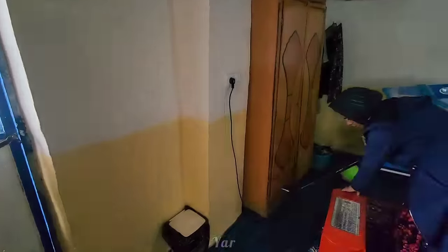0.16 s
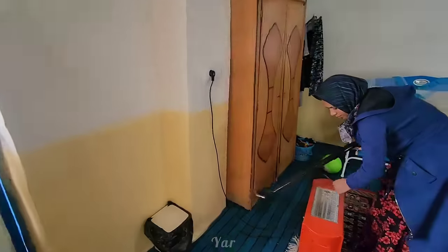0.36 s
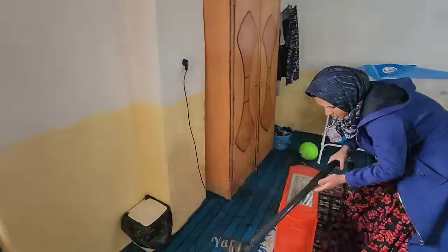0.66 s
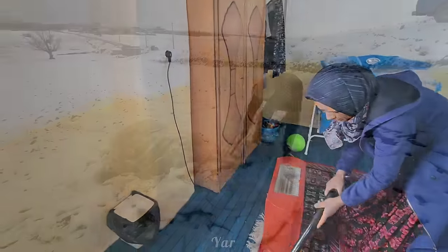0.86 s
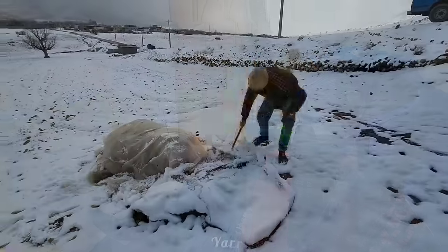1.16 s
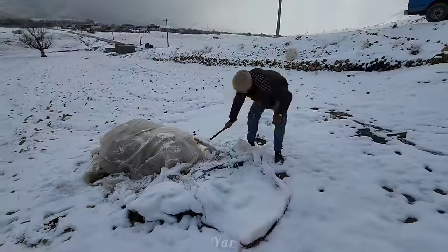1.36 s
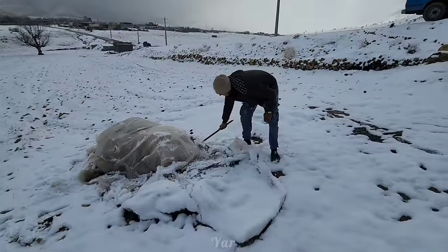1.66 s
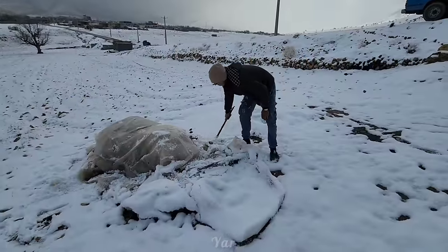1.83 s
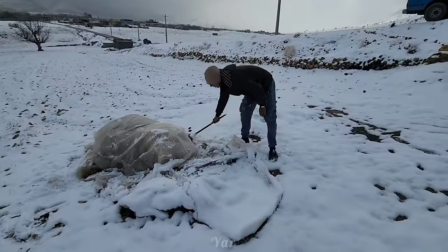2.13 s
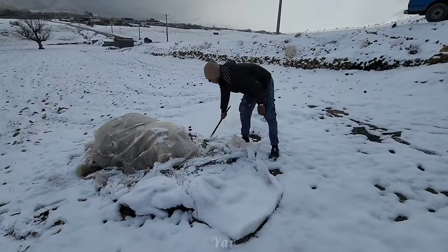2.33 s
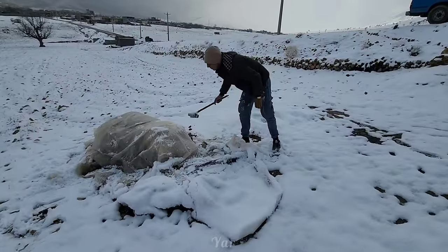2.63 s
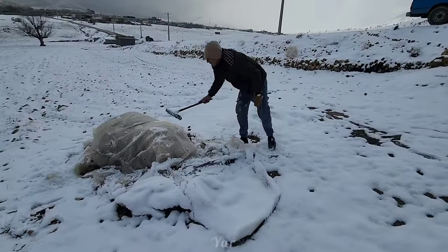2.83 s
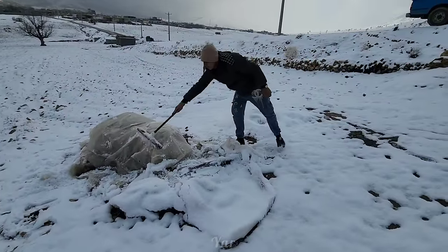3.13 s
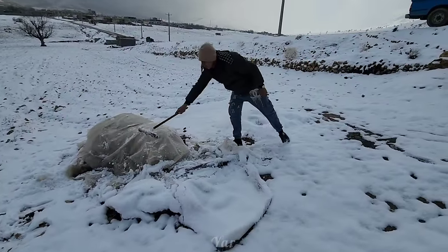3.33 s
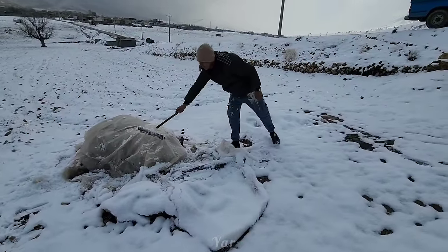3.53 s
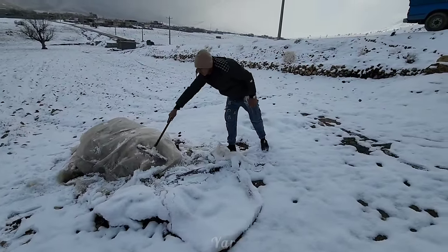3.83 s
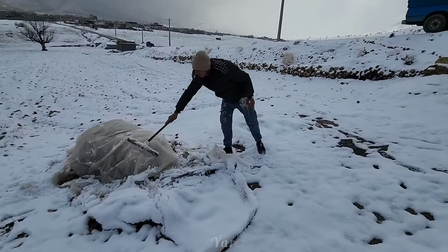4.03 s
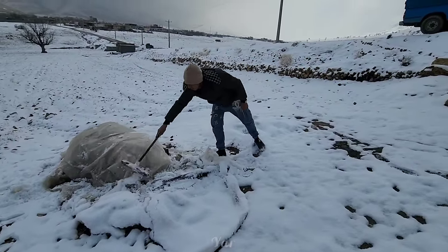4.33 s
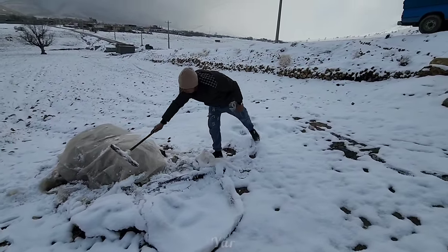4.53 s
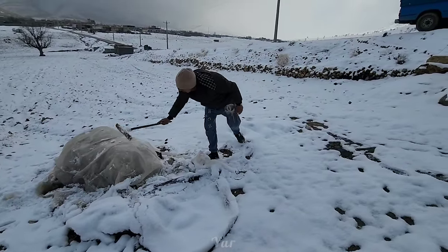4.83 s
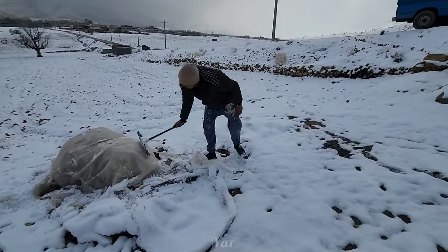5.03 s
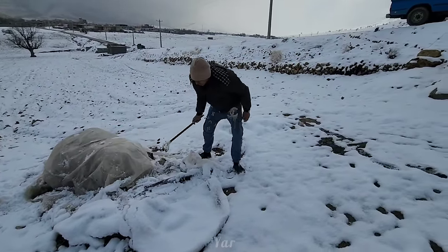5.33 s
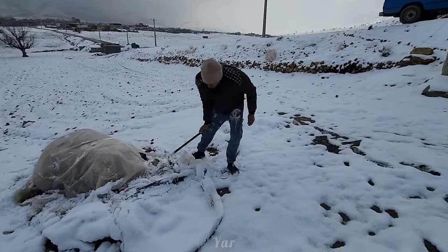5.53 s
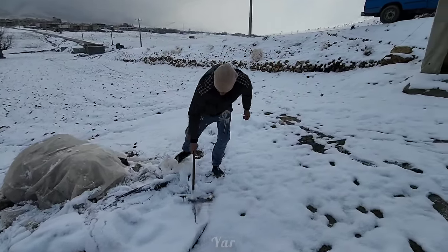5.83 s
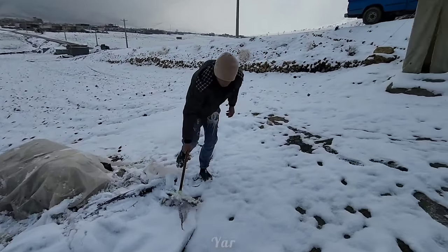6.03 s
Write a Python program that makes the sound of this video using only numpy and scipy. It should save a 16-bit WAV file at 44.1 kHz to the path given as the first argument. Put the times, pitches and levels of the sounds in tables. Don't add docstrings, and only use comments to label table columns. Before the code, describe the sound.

Loud indoor vacuuming gives way to a quiet snowy field, where broom scrapes, sharp crusty beats and small snaps come between soft wind buffets.

```python
import sys
import numpy as np
from scipy import signal
from scipy.fft import rfft, irfft, next_fast_len
from scipy.io import wavfile
from scipy.ndimage import uniform_filter1d

SR = 44100
rng = np.random.default_rng(int(sys.argv[2]) if len(sys.argv) > 2 else 0)


def invert_db(x):
    u = np.asarray(x, float) / 20
    return 10 ** u


def unload_audio(sound):
    columns = np.transpose(np.atleast_2d(sound))
    steps = np.round(np.clip(columns, -1, 1) * 32767)
    wavfile.write(sys.argv[1], SR, steps.astype(np.int16))


N = 272538


def rms_one(x):
    return x / np.sqrt(np.mean(x ** 2) + 1e-20)


def in_time(rows):
    s, *columns = np.transpose(rows)
    return [np.interp(np.arange(N) / SR, s, column) for column in columns]


def at_hz(points, hz):
    point_hz, values = np.transpose(points)
    return np.interp(np.log(hz), np.log(point_hz), values)


def drift(rate_hz, n):
    r = np.exp(-40 * np.pi * rate_hz / SR)
    white = rng.standard_normal(n // 20 + 2002)
    slow = signal.lfilter([1], [1, -2 * r, r * r], white)[2000:]
    return np.interp(np.arange(n) / 20, np.arange(len(slow)), rms_one(slow))


def band(x, low_hz, high_hz):
    return signal.sosfilt(signal.butter(2, [low_hz, high_hz], "band", fs=SR, output="sos"), x)


def ring(x, hz, width_hz):
    r = np.exp(-np.pi * width_hz / SR)
    poles = [1, -2 * r * np.cos(2 * np.pi * hz / SR), r * r]
    return signal.lfilter([(1 - r * r) / 2, 0, (r * r - 1) / 2], poles, x)


def evened(x, span_s):
    power = uniform_filter1d(np.mean(x ** 2, axis=0), size=round(span_s * SR))
    return x / (power + .05) ** .35


def coloured(sources, spectrum, likeness, registers_hz, patchy_db, flicker_hz):
    out = np.zeros((len(registers_hz) + 1,) + sources.shape[1:])
    edges_hz = 16 * 2 ** np.arange(0, 10.1, 1 / 3)
    for k, (low, high) in enumerate(zip(edges_hz, edges_hz[1:])):
        hz = np.sqrt(low * high)
        if spectrum[0][0] < hz < spectrum[-1][0]:
            mid, side = band(sources[k % 2], low, high)
            alike = np.clip(at_hz(likeness, hz), -.99, .99)
            gain = invert_db(at_hz(spectrum, hz) + patchy_db * drift(flicker_hz, len(mid)))
            pair = np.sqrt(1 + alike) * mid + np.sqrt(1 - alike) * side * [[1], [-1]]
            out[np.searchsorted(registers_hz, hz)] += gain * pair
    return [part / np.sqrt(np.mean(part.mean(axis=0) ** 2) + 1e-20) for part in out]


def echoed(x, t60_s, wet_db, hold_s):
    n, hop = x.shape[-1], round(hold_s * SR)
    t = np.arange(round(t60_s * SR)) / SR
    out = np.pad(x, ((0, 0), (0, 0), (0, 3 * hop + len(t))))
    padded = np.pad(x, ((0, 0), (0, 0), (hop, 2 * hop)))
    for i in range(0, n + hop, hop):
        piece = padded[..., i:i + 2 * hop]
        piece = piece * np.sqrt(np.hanning(piece.shape[-1]))
        tail = rng.standard_normal(x.shape[:2] + t.shape) * invert_db(-60 * t / t60_s)
        tail = tail / np.sqrt(np.sum(tail ** 2, axis=-1, keepdims=True))
        wet = signal.fftconvolve(piece, tail, axes=-1)
        skip = max(hop - i, 0)
        out[..., i - hop + skip:i - hop + wet.shape[-1]] += invert_db(wet_db) * wet[..., skip:]
    return out[..., :n]


def wind():
    # start_s, buffet_db, left_over_right_db
    gust_rows = [(1.26, -42, 0), (1.39, -56, -8), (1.63, -42, 5), (1.89, -49, 4), (2.07, -54, 7),
                 (2.22, -47, 12.5), (2.49, -43, -5.5), (2.56, -53, 6.5), (2.92, -52, 4), (3.02, -38.5, 7),
                 (3.09, -57.5, 3), (3.8, -58, 3), (3.91, -49.5, -6), (4.74, -60, 4.5), (5.14, -60, -2),
                 (5.86, -68, -1), (5.95, -53.5, 12), (6.18, -52.5, 4.5)]
    # freq_hz, level_db (per Hz)
    buffet_spectrum = [(8.8, -37), (15, -12), (43, -1), (70, -2), (114, -13), (184, -27.5), (275, -59.5),
                       (300, -96), (390, -65), (660, -120)]
    # freq_hz, level_db (per Hz)
    field_spectrum = [(120, -29.5), (200, 0), (254, 4.5), (612, 9.5), (851, 2), (1500, 2.5), (2700, -17.5),
                      (7680, -17), (11500, -22.5), (16000, -24)]
    field_db = -70
    buffet_db, pan_db = in_time(gust_rows)
    fade_in = np.clip((np.arange(N) / SR - .7) / 0.84, 0, 1)
    white = rng.standard_normal((2, 2, N))
    buffet, = coloured(white, buffet_spectrum, [(20, .85), (300, .9)], [], patchy_db=2.0, flicker_hz=8.0)
    hush, = coloured(white, field_spectrum, [(200, .5), (1500, .1), (16000, .1)], [],
                     patchy_db=2.2, flicker_hz=10.0)
    gusts = invert_db(buffet_db + 3.5 + 1.9 * drift(15.0, N) + pan_db * np.array([[.5], [-.5]]))
    return fade_in * (gusts * evened(buffet, 0.059) + invert_db(field_db) * hush)


def swells(rows, n):
    edge_db_per_s, node_db = 249, -28
    t = np.arange(n) / SR
    tops = []
    for start, end, db in rows:
        outside_s = np.maximum(np.maximum(start - t, t - end), 0)
        tops.append(db - edge_db_per_s * outside_s)
    return np.maximum(np.max(tops, axis=0), node_db + min(db for *_, db in rows) / 2)


def booms(n):
    # start_s, end_s, level_db (above the roar), pitch_hz, width_hz
    hums = [(-.05, .22, -5.5, 262, 30), (.33, 0.734, -7.5, 258, 32), (0.827, .95, -4, 255, 30),
            (1.065, 1.175, -6.5, 258, 30), (-.05, .13, -7, 110, 60), (.1, 0.22, -3, 1200, 72),
            (0.265, .46, -6, 1040, 53), (0.635, 0.694, 2, 1030, 50), (0.32, 0.22, -3.5, 800, 44),
            (.42, 0.57, -7, 860, 56), (0.91, 0.932, 1, 810, 50), (0.37, 0.33, -5.5, 470, 40),
            (0.455, 0.61, -7, 465, 35), (.56, 0.66, -8, 2150, 90), (.72, 0.82, -6.5, 1400, 60)]
    alike_below_hz = 700.0
    out, noise = 0, rng.standard_normal((2, n))
    for start, end, db, hz, width in hums:
        mid, side = ring(ring(noise, hz, width), hz, width)
        pair = mid + min((hz / alike_below_hz) ** 2, 1) * side * [[1], [-1]]
        steady = evened(pair / np.sqrt(np.mean(mid ** 2)), 0.022)
        out = out + invert_db(swells([(start, end, db)], n)) * steady
    return out


def rotor_tones(roar_db, n):
    # time_s, turns_per_s
    shaft_speed = [
        (0, 554.2),
        (1.0, 554.2),
        (1.2, 555.4),
        (1.4, 556.0),
    ]
    # start_s, end_s, level_db (above the roar)
    shaft_swells = [(-.05, .2, -8), (.27, .36, -11), (.54, .68, -12.5), (.76, 1.4, -3.5)]
    # start_s, end_s, level_db (above the roar)
    blade_swells = [(.06, .17, -18), (.3, .55, -22.5), (.55, .88, -16), (.88, 1.0, -18), (1.0, 1.12, -16),
                    (1.12, 1.27, -20.5)]
    # start_s, end_s, level_db (above the roar)
    whistle_swells = [(.06, .2, -20.5), (.2, .27, -27), (.33, .51, -23), (.53, .67, -28), (.73, .81, -26.5),
                      (.87, .98, -27.5), (1.03, 1.194, -29), (1.3, 1.42, -29)]
    # time_s, shaft_db, blade_db, whistle_db
    tone_pan = [(0, 14, -3, -9), (.2, 10, 0, -8), (.3, -3, -3, -6), (.55, -12, -3, -8), (.75, -2, -12, -10),
                (1.15, 0, -10, 0)]
    blades, waver_db = 9, 1.6
    speed = in_time(shaft_speed)[0][:n] * (1 + 0.000093 * drift(1.6, n))
    turn = 2 * np.pi * np.cumsum(speed) / SR
    orders, lags = [1, blades, 2 * blades], [.2, 1.0, 1.0]
    tones = invert_db(roar_db - 34) * np.sin(3 * blades * turn)
    for order, lag, rows, pan_db in zip(orders, lags, [shaft_swells, blade_swells, whistle_swells],
                                        in_time(tone_pan)):
        level = invert_db(roar_db + swells(rows, n) + 0.3 + waver_db * drift(8.0, n))
        pan = np.sqrt(8) / (1 + invert_db(pan_db[:n] * np.array([[-1], [1]])))
        tones = tones + pan * level * np.sin(order * turn + lag * np.array([[.5], [-.5]]))
    return tones


def vacuum():
    # time_s, roar_db
    suction = [
        (0.0, -31.5),
        (0.45, -29.5),
        (0.75, -33),
        (1.0, -33.5),
        (1.25, -39),
        (1.36, -45),
        (1.48, -59),
    ]
    # freq_hz, level_db (per Hz)
    air_spectrum = [(18, -37.5), (30, -17.5), (93, -7), (194, -8.5), (259, -9.5), (512, -6), (554, -7.5),
                    (740, -3), (1040, 1.5), (1160, -2), (1860, -2), (2750, -12), (7470, -20.5),
                    (10800, -35), (16000, -27)]
    # pitch_hz, width_hz, level_db
    casing = [(258, 26, 1.5), (290, 43, 0), (350, 27, 0.5), (630, 21, -2.5), (469, 53, 0.5),
              (846, 13, -5.5), (1040, 70, -1), (1430, 20, -4.5), (2040, 200, -3.5), (3400, 300, -8),
              (7400, 240, -4.5)]
    # freq_hz, likeness
    room_likeness = [(60, .95), (130, .93), (290, .93), (640, .45), (1400, 0), (15000, 0)]
    rush_over_roar_db, hiss_over_roar_db = 1, -3
    turn_away_s, turn_s, dulling_db = 0.81, 0.18, 5.5
    n = round(suction[-1][0] * SR) + 2000
    gate = np.clip((n - np.arange(n)) / 4000, 0, 1)
    roar_db = in_time(suction)[0][:n]
    dull_db = dulling_db * np.clip((np.arange(n) / SR - turn_away_s) / turn_s, 0, 1)
    white = echoed(rng.standard_normal((2, 2, n)), .2, 0.96, hold_s=0.1204)
    white = white + sum(invert_db(db) * ring(white, hz, width) for hz, width, db in casing)
    roar, rush, hiss = coloured(white, air_spectrum, room_likeness, [750, 2500],
                                patchy_db=0.82, flicker_hz=2.1)
    air = evened(roar, 0.08) + booms(n)
    air = air + invert_db(rush_over_roar_db - dull_db) * rush
    air = air + invert_db(hiss_over_roar_db - dull_db) * hiss
    cleaner = invert_db(roar_db) * air + rotor_tones(roar_db, n)
    return np.pad(cleaner * gate, ((0, 0), (0, N - n)))


def bumps():
    # peak_s, half_length_s, peak_db, pitch_hz
    bump_rows = [(1.283, 0.011, -26, 221), (1.536, 0.021, -30.5, 116.5), (2.171, 0.0088, -38.5, 59),
                 (2.301, 0.025, -37.5, 117), (2.94, 0.0089, -34, 57), (3.016, .015, -31, 75),
                 (3.452, 0.021, -46, 55), (3.586, 0.016, -42.5, 55), (3.82, 0.013, -23.5, 158.6),
                 (3.939, 0.0095, -36, 76), (4.241, 0.012, -21.5, 105), (4.58, 0.011, -28.5, 189),
                 (4.952, 0.0083, -33, 68.5), (5.176, 0.0075, -41, 57.6), (5.728, 0.0064, -44, 90)]
    t = np.arange(N) / SR
    out = np.zeros(N)
    for s, half, db, hz in bump_rows:
        out += invert_db(db) * np.exp(-.5 * ((t - s) / half) ** 2) * np.sin(2 * np.pi * hz * (t - s))
    return out


def whirs():
    # middle_s, half_length_s, level_db, pitch_hz, width_hz
    short_noises = [(4.82, .08, -69, 567, 80), (3.07, .09, -44, 540, 140), (2.47, .02, -63, 1550, 160),
                    (2.522, .018, -63, 1500, 160), (2.52, .015, -64, 1150, 120), (2.59, .018, -64, 1520, 130),
                    (2.68, .025, -69, 1400, 200), (2.675, .015, -65, 600, 120), (2.12, .03, -73, 1450, 120),
                    (2.03, .015, -64, 700, 250), (1.53, .03, -48, 1500, 400), (3.343, .006, -52, 4000, 1500),
                    (3.345, .012, -46, 420, 150), (3.81, .025, -34, 1500, 500), (3.815, .025, -33, 780, 250),
                    (4.365, .008, -52, 2600, 900), (5.37, .085, -73, 2060, 110), (5.29, .008, -62, 1560, 250),
                    (5.6, .008, -63, 2000, 200), (5.575, .007, -66, 1100, 200), (5.725, .012, -37, 1350, 600),
                    (5.752, .006, -44, 600, 250), (5.84, .012, -48, 700, 300), (5.0, .03, -52, 2000, 400),
                    (4.95, .012, -46, 1600, 300), (5.36, .015, -62, 500, 150), (6.14, .012, -62, 700, 300),
                    (3.04, .04, -48, 1500, 700), (3.36, .04, -64, 13500, 3000), (5.745, .03, -57, 12000, 5000),
                    (5.735, .02, -44, 300, 150), (5.727, .0015, -33, 1600, 1500), (5.732, .0015, -35, 1000, 900),
                    (5.765, .002, -44, 1500, 1200), (5.823, .0015, -45, 1500, 1200),
                    (1.561, .0015, -41, 1800, 1500), (1.59, .002, -42, 1500, 1200), (1.81, .002, -48, 5000, 3000),
                    (1.773, .003, -50, 2500, 1800), (1.664, .002, -48, 2200, 1500)]
    out, noise = np.zeros(N), rng.standard_normal(N)
    for s, half, db, hz, width in short_noises:
        first = round((s - 2 * half) * SR) - 1000
        span = np.arange(first, min(round((s + 2 * half) * SR), N))
        creak = rms_one(ring(ring(noise[span], hz, width), hz, width))
        out[span] += invert_db(db) * np.exp(-((span / SR - s) / half) ** 4) * creak
    return out


def cracks():
    # start_s, ring_db, pitch_hz, snap_db
    snaps = [(1.449, -34, 6000, -48), (1.488, -44, 5000, -25.5), (1.516, -23.5, 1430, -23),
             (1.605, -31, 1490, -46), (1.418, -32, 2450, -44), (1.478, -49, 9000, -48),
             (1.535, -36, 12500, -32), (1.572, -30, 3000, -34), (1.81, -42, 4500, -40),
             (2.2499, -40, 2500, -38), (2.2948, -37, 2500, -34), (3.074, -36, 9500, -28),
             (3.128, -32, 11000, -34), (3.145, -39, 5530, -38), (3.794, -18, 1470, -26),
             (3.806, -30, 5900, -20), (4.2208, -29, 930, -15), (4.238, -22, 3500, -17),
             (4.675, -50, 4950, -49), (4.992, -39, 4500, -42), (5.052, -49, 7000, -55.5),
             (5.703, -41, 3550, -34), (5.752, -32, 2960, -33), (4.79, -59, 13000, -54),
             (1.769, -39, 910, -50), (1.824, -46, 1450, -27), (1.851, -37, 700, -50),
             (2.3434, -38, 2600, -33), (2.3658, -24, 540, -20.5), (2.989, -32, 5100, -42),
             (3.083, -35, 6130, -21), (3.097, -29, 900, -21), (3.114, -38, 5560, -16),
             (3.265, -52, 5000, -52), (3.34, -27.5, 387, -41), (3.8221, -26, 910, -8),
             (4.059, -58, 1000, -53), (4.3588, -24.5, 1420, -23.5), (4.578, -24, 504, -9.5),
             (4.941, -24.5, 577, -35), (4.909, -52, 905, -48), (5.107, -60, 3500, -59),
             (5.14, -58, 3860, -43), (5.144, -61, 6000, -47), (5.291, -60, 9000, -54),
             (3.533, -59, 9000, -58), (5.8267, -27, 2600, -26)]
    # start_s, ring_db, pitch_hz
    knocks = [(2.155, -59, 3670), (1.635, -38, 1480), (3.02, -39, 5000), (3.05, -36, 5200),
              (3.156, -35, 2500), (3.17, -35, 1800), (3.2, -34, 2000), (4.074, -60, 1800),
              (4.145, -55, 3500), (4.386, -50, 4000), (5.004, -28, 1210), (5.018, -38, 1800),
              (5.034, -37, 1090), (5.067, -52, 1000), (5.315, -52, 1200), (5.493, -44, 500),
              (5.809, -37.5, 1490), (2.464, -52, 2000), (2.52, -47, 2520), (2.591, -49, 1520),
              (2.658, -58, 1430), (1.95, -65, 630), (1.978, -60, 740), (1.661, -38.5, 1510),
              (1.718, -40, 900), (1.808, -33.5, 915), (2.217, -49, 1510), (2.931, -46, 600),
              (3.232, -37.5, 530), (3.442, -40, 1510), (3.574, -44.5, 3980), (3.608, -53, 3660),
              (3.881, -29, 2500), (4.0035, -23, 900), (4.279, -23, 1090), (4.656, -28, 1030),
              (4.667, -29, 600), (4.835, -47, 555), (5.226, -34, 1220), (5.29, -44, 795),
              (5.351, -40.5, 560), (5.508, -35, 270), (5.656, -31, 340), (5.666, -41, 500),
              (5.7205, -19, 790), (5.738, -18, 674), (5.8316, -25, 930), (5.6, -45, 1500),
              (5.635, -63, 5000), (6, -48, 807), (6.012, -54, 2500)]
    snap_t60_s, knock_t60_s = 0.014, 0.010
    knock_snap_db, ring_trim_db = -30, -3
    ring_tilt = 0.28
    fizz_share, snap_top_hz = 0.32, 15000
    out, t = np.zeros((2, N + 3000)), np.arange(3000) / SR
    rows = [row + (snap_t60_s,) for row in snaps]
    rows += [(s, db, hz, db + knock_snap_db, knock_t60_s) for s, db, hz in knocks]
    noise = rng.standard_normal((len(rows), 3, 3000))
    for (s, ring_db, hz, snap_db, t60), (both, *own) in zip(rows, noise):
        t60 = np.clip(t60 * (1000 / hz) ** ring_tilt, .003, .06)
        rough = 0.77 * rms_one(ring(ring(both, hz, hz), hz, hz))
        tone = (rough - np.sin(2 * np.pi * hz * t)) * invert_db(ring_db - 60 * t / t60)
        spike = -np.exp(-((t - .0002) / .00005) ** 2)
        fizz = fizz_share * (.9 * both + .4 * np.array(own)) * invert_db(-60 * t / .015)
        crack = invert_db(ring_trim_db) * band(tone, hz / 3.0, min(4.0 * hz, 17000))
        crack = crack + invert_db(snap_db + 2) * band(spike + fizz, 700, snap_top_hz)
        out[:, round(s * SR):][:, :3000] += crack
    return out[:, :N]


def contacts():
    # start_s, swell_s, crunch_db, t60_s,
    # thump_db (above crunch)
    scrapes = [(1.265, 0.015, -36.5, 0.2, 2.5), (1.93, 0.063, -76, .3, 19), (1.40, 0.0088, -42.5, 0.8, -3),
               (1.484, 0.047, -36, 0.29, -2), (1.53, 0.048, -43, 0.27, 2), (1.754, 0.018, -46, 0.089, -1),
               (1.799, 0.018, -41.5, 0.15, -9), (1.84, 0.012, -47.5, .05, -8),
               (2.243, 0.006, -43, 0.38, 3.5), (2.278, 0.017, -42.5, 0.31, 1),
               (2.97, 0.015, -37.5, 0.31, -3), (2.99, 0.051, -34.5, 0.31, -8),
               (3.05, 0.053, -32.5, 0.23, -4), (3.1, 0.044, -37, 0.1, -2), (4.209, 0.0059, -29, 0.14, 2),
               (4.3, 0.012, -47.5, .14, 10.5), (4.645, 0.028, -38.5, 0.2, -1.5),
               (5.025, 0.017, -51, 0.061, 1.5), (5.699, 0.0095, -39.5, 0.31, -4),
               (5.822, 0.008, -42, 0.07, -12), (5.835, 0.018, -51, 0.077, -0.5)]
    # start_s, swell_s, crunch_db, t60_s, spray_db (above crunch)
    rustles = [(1.66, 0.035, -59.5, 1, -2.5), (2.19, 0.032, -63, .15, -4), (2.363, 0.0059, -57, 0.12, -10),
               (2.42, 0.078, -60.5, 0.4, -3.5), (2.64, 0.058, -70, 0.39, -2),
               (2.915, 0.054, -68, 0.17, -13), (3.16, 0.013, -52, 0.56, -2),
               (3.324, 0.019, -45.5, 0.17, 1.5), (3.36, .017, -61, 0.5, -2), (3.43, 0.021, -56, 0.088, -11),
               (3.568, .0077, -76, 0.6, 8), (4.05, 0.013, -49, 0.089, -8.5), (4.135, 0.03, -77, 0.77, 6),
               (5.198, 0.045, -53, 0.18, -2), (5.28, 0.069, -64, 1, -11), (5.345, .01, -53.5, 0.063, -10),
               (5.469, 0.033, -62, 0.32, -11.5), (5.55, 0.059, -60, 0.45, -7),
               (5.99, 0.017, -73, 0.32, -17.5), (6.105, 0.019, -61.5, 0.073, -2),
               (4.72, 0.081, -66, 1, 0.5), (2.5, 0.022, -57.5, 0.072, -10), (5.507, .005, -52, .06, -19),
               (5.654, .005, -51, .06, -18), (6.009, .005, -63, .05, -6)]
    # start_s, swell_s, crunch_db, slide_after_s, slide_db (above the beat)
    beats = [
        (3.783, 0.037, -20, 0.063, -15),
        (4.216, 0.02, -19, 0.046, -19),
        (4.555, 0.025, -22.5, 0.054, -13.5),
        (4.935, 0.01, -31.5, 0.021, -8),
        (5.709, 0.03, -33, 0.073, -17),
    ]
    scrape_spray_db, rustle_thump_db, rustle_fizz_db = -9, -5, -6
    rows = [row + (scrape_spray_db, 0) for row in scrapes]
    rows += [row[:-1] + (rustle_thump_db, row[-1], rustle_fizz_db) for row in rustles]
    slide_swell_s = 0.021
    for s, swell, db, after, slide_db in beats:
        beat = (s, swell, db, 0.13, -3.5, -8.5, 0)
        slide = (s + after, slide_swell_s, db + slide_db, 0.24, -2, -11.5, -3.5)
        trickle = (s + .15, slide_swell_s, db - 37.5, 1.0, -1, -3, -3)
        rows += [beat, slide, trickle]
    return rows


def pressure():
    touch_share, touch_longest_s = 0.29, .04
    sheen_base_db, sheen_per_db = -5.5, -0.1157
    fizz_base_db, fizz_per_db = -4.5, -0.12
    t, power = np.arange(0, N + 20, 20) / SR, 0
    for s, swell, db, t60, thump_db, spray_db, fizz_db in contacts():
        touch = np.clip((t - s) / np.clip(touch_share * swell, .004, touch_longest_s), 0, 1)
        rise_db = -7 * (1 - (t - s) / swell)
        fall_db = -60 * (t - s - swell) / t60
        shape_db = np.minimum(np.where(t < s + swell, rise_db, fall_db), 0)
        sheen_db = spray_db + sheen_base_db + sheen_per_db * (db + 39)
        finest_db = spray_db + fizz_db + fizz_base_db + fizz_per_db * (db + 38.5)
        registers_db = np.array([[thump_db], [0], [spray_db], [sheen_db], [finest_db]])
        power = power + (touch * invert_db(db + shape_db + registers_db)) ** 2
    return [np.interp(np.arange(N) / SR, t, np.sqrt(p)) for p in power]


def grains(per_s, spread_db, bed):
    born = rng.random(N) < per_s * invert_db(4.0 * drift(80, N)) / SR
    sizes = born * invert_db(spread_db * np.minimum(rng.exponential(1, N), 4.0))
    burst = signal.lfilter([1], [1, -.93], sizes)
    lumps = invert_db(1.0 * drift(90, N))
    strength = lumps * (rms_one(burst) + bed) / (bed + 0.46)
    breaks = strength * rng.standard_normal((2, 2, N))
    return echoed(breaks, .025, -3.0, hold_s=0.11)


def strokes():
    # freq_hz, level_db (per Hz)
    crunch_spectrum = [(50, -4.5), (110, 0), (180, -2.5), (330, -15.5), (500, -7.5), (1000, -15),
                       (2000, -15), (2700, -22), (4500, -25.5), (7500, -33.5), (9200, -35), (11600, -35.5),
                       (16500, -28.5)]
    # freq_hz, likeness
    field_likeness = [(100, 1), (500, 0.88), (2000, 0.65), (6000, 0.29), (14000, 0.13)]
    hard_bed, soft_bed, soft_below_db = 1.35, 3.4, -45.5
    gains = pressure()
    crunch_db = 20 * np.log10(gains[1] + 1e-9)
    soft = np.clip((soft_below_db - crunch_db) / 10, 0, 1)
    source = grains(900, 4.0, hard_bed + (soft_bed - hard_bed) * soft)
    layers = coloured(source, crunch_spectrum, field_likeness, [300, 2500, 6000, 9500],
                      patchy_db=1.0, flicker_hz=40.0)
    nearer_left = invert_db([[.7], [-.7]])
    return nearer_left * sum(gain * evened(layer, .03) for gain, layer in zip(gains, layers))


def lead_left(x):
    # time_s, lag_samples
    left_lead = [(1.5, 4.5), (2.3, 1.9), (3.0, 7.2), (3.8, 7.7), (4.6, 10.8), (5.0, 8.8), (5.7, 3.6)]
    late = np.interp(np.arange(N) - in_time(left_lead)[0], np.arange(N), x[1])
    return np.array([x[0], late])


def shelved(x):
    shelf_hz, shelf_db, slope_hz = 9070, -6.5, 800.0
    n = next_fast_len(N + 2000)
    over = np.clip((np.arange(n // 2 + 1) * SR / n - shelf_hz) / slope_hz + .5, 0, 1)
    return irfft(rfft(x, n) * invert_db(shelf_db * over), n)[:, :N]


def scene():
    broom = lead_left(strokes() + cracks() + whirs())
    return vacuum() + bumps() + shelved(broom + wind())


def band_limit(x):
    return signal.sosfilt(signal.butter(12, 16000, fs=SR, output="sos"), x)


def record(dry):
    top_hz = 15760
    cut = signal.sosfilt(signal.ellip(10, .5, 60, top_hz, fs=SR, output="sos"), dry)
    mix = cut * np.clip((N - np.arange(N)) / 300, 0, 1)
    return band_limit(mix)


dry = scene()
out = record(dry)
unload_audio(out)
```